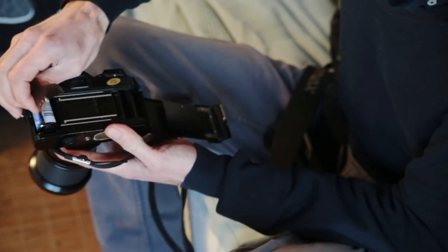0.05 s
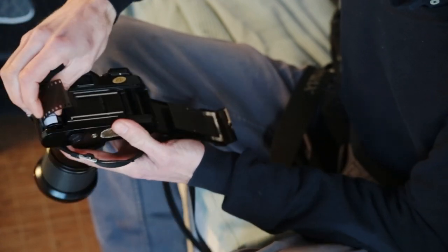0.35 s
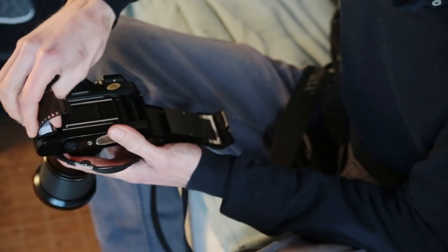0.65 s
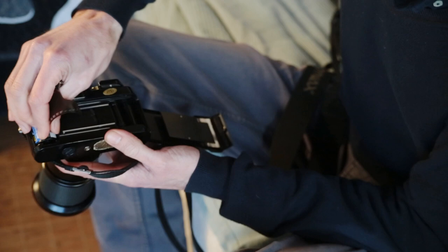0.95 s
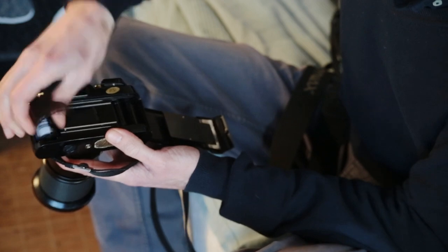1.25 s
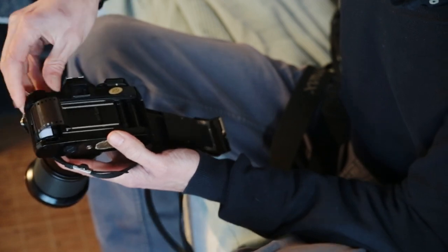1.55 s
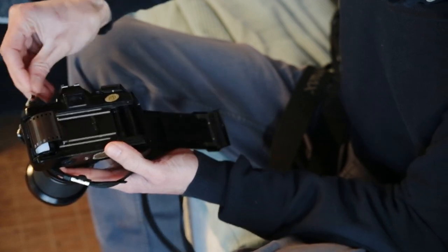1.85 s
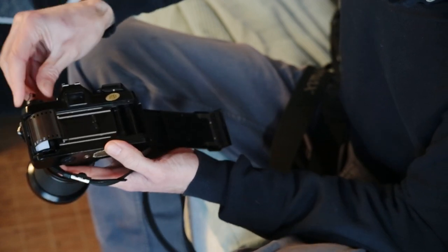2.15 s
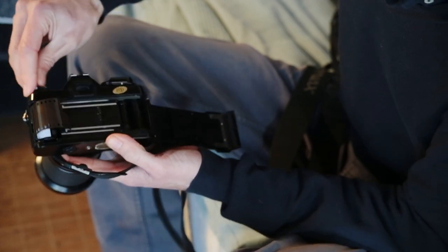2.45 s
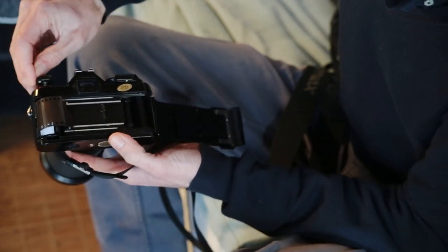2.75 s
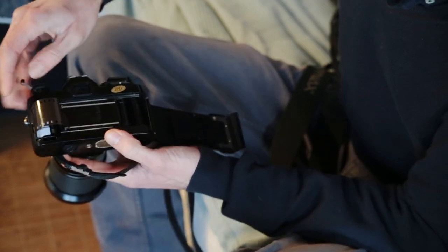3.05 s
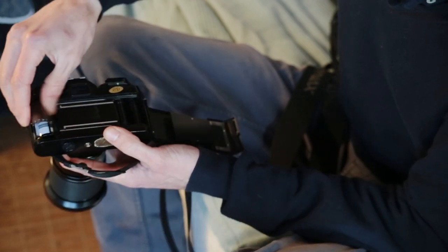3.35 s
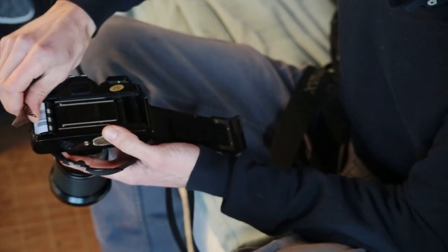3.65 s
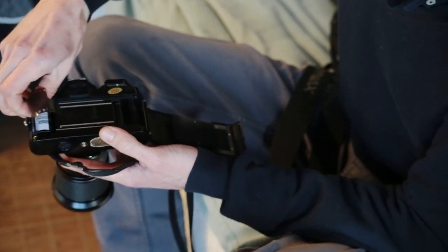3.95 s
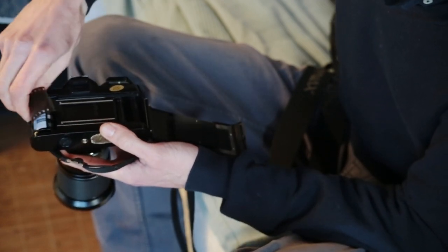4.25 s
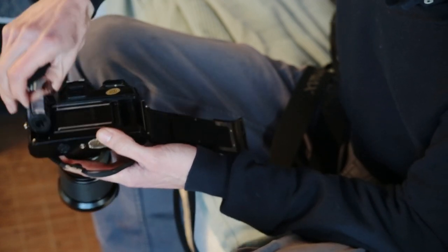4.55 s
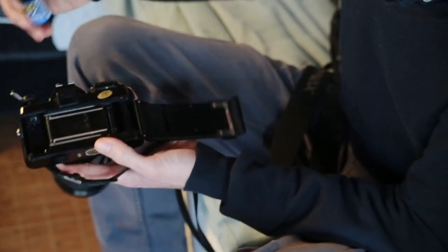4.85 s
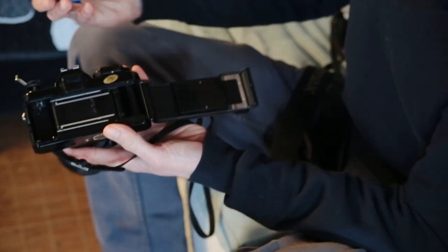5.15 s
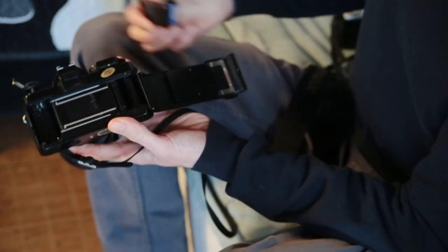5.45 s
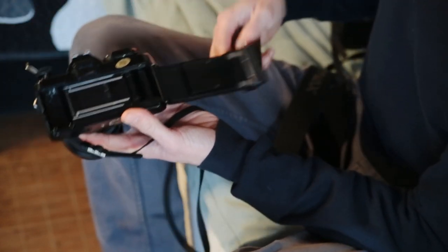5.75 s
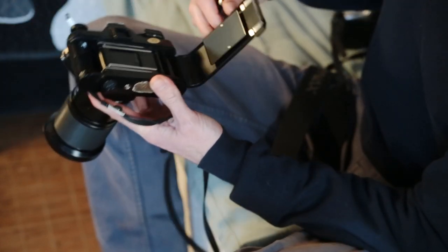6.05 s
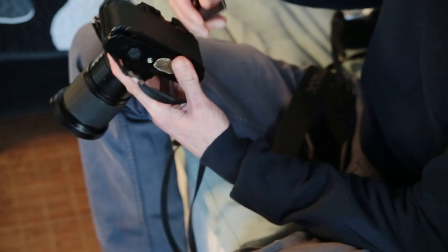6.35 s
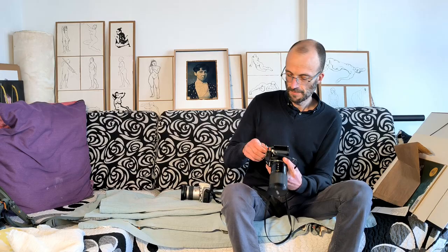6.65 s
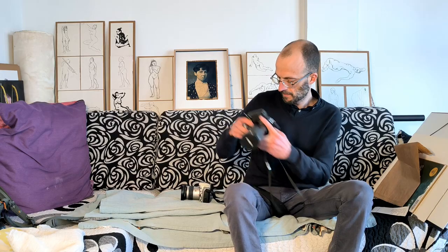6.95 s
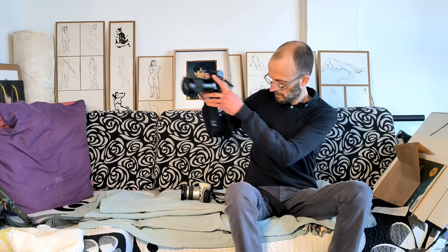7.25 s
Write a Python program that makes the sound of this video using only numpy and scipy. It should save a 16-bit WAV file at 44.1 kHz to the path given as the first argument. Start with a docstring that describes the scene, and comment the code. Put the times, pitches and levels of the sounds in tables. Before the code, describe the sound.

Close to the microphone in a living room, fingers work the rewind crank of an open film camera, making clusters of small, sharp clicks with pauses between. The metal crank buzzes briefly, and the cassette comes out with more clicks and tiny scrapes. A sleeve rustles softly, then the back is shut with a few ringing knocks. Faint ticks follow, over a low room rumble and hiss.

```python
"""Handling an open film camera

Close to the microphone in a living room, fingers work the rewind crank and ease the film cassette out.
Small parts click when tapped and scrape as they slide, and the metal crank buzzes briefly. A sleeve
rustles, and the back is swung shut and pressed until it latches, with knocks that make the body ring.
Each contact leaves a short room echo, over a faint steady rumble and hiss."""
import sys
import numpy as np
from scipy import signal
from scipy.fft import rfft, irfft
from scipy.io import wavfile

SR = 44100
rng = np.random.default_rng(int(sys.argv[2]) if len(sys.argv) > 2 else 0)


def waveform_to_disk(signal):
    """Save audio, clipped to [-1, 1], as 16-bit WAV at the path in sys.argv[1]."""
    frames = np.transpose(np.atleast_2d(signal))
    scaled = np.clip(frames, -1, 1) * 32767
    samples = np.round(scaled).astype(np.int16)
    wavfile.write(sys.argv[1], SR, samples)


N = 331191
TIME = np.arange(N) / SR

# Clicks as the cassette is worked, the crank pulled up, the cassette prised out, the back swung round
# and the camera turned over. Each row: start in seconds, relative level in dB, ringing pitch in Hz,
# added brightness in dB per octave.
CLICKS = [ (0.054, -45.5, 8000, 7.5), (0.097, -46.5, 2040, -2.5), (0.277, -29, 2210, -4.5),
          (0.3063, -30, 2520, -6), (0.3127, -32.5, 5130, -2), (0.341, -34, 2660, -5.5),
          (0.407, -40.5, 3040, -6), (0.854, -48, 4720, -6.5), (0.9373, -27, 5500, -3.5),
          (0.951, -34, 3330, -2), (0.991, -31.5, 2950, -2.5), (1.093, -37.5, 1830, -3),
          (1.21, -50, 2650, -8), (1.256, -40, 1830, -2.5), (1.295, -40, 2250, -3), (1.337, -29, 2350, -1.5),
          (1.350, -27, 2700, 0), (1.4087, -22, 10040, 22.5), (1.4216, -30, 4400, 6.5),
          (1.566, -47, 2430, -9.5), (1.830, -45.5, 2480, -9.5), (1.902, -46.5, 2820, -3.5),
          (2.012, -53.5, 1940, -8), (2.264, -52.5, 1740, -4), (2.664, -54.5, 1230, -24),
          (2.7375, -34.5, 3170, -5), (2.7497, -31, 2360, 4.5), (2.7723, -37, 3030, 2),
          (3.2948, -33, 7700, 6.5), (3.304, -34.5, 9450, 3.5), (3.4037, -35, 9300, 4.5),
          (3.4294, -39, 3900, -1.5), (3.608, -54.5, 1640, -2), (3.8355, -34, 9600, 11),
          (3.855, -31, 5950, 8.5), (3.9137, -38.5, 2320, -1), (3.963, -48, 2620, -3),
          (4.060, -47.5, 2480, -7.5), (4.095, -50.5, 2840, -11), (4.1313, -37.5, 2280, -5),
          (4.139, -38, 2570, -2.5), (4.495, -38.5, 2070, 1), (4.617, -48.5, 4570, -7.5),
          (4.759, -52, 7340, -.5), (5.379, -50, 3350, 2), (5.5607, -45.5, 4530, 5), (5.614, -56, 1050, -14),
          (5.670, -34, 4500, 14), (5.690, -38, 7850, 6), (5.836, -46.5, 3120, 4),
          (6.349, -45.5, 1640, -0.5), (6.962, -45.5, 3930, 3), (7.0672, -47.5, 2920, -13.5),
          (7.107, -48, 2980, -6.5), (7.261, -46, 3440, 1)]


def clicks(tails, chatter_fade_s=0.018, ring_db=-3.0, ring_sharpness=2.8, gain_db=20.5, low_cut_hz=900):
    """Each click is a sharp crack plus the very short ring of the small part that was touched."""
    # The tone of a click. Each row: frequency in Hz, relative level in dB.
    tone = [(150, -55), (400, -14.5), (800, -15), (1200, -12), (1700, -4), (2800, -3), (4200, -4.5),
            (6500, -5), (9000, -9.5), (16000, -25)]
    out = np.zeros(N)
    low_cut = signal.butter(2, low_cut_hz, "high", fs=SR, output="sos")  # small parts give little bass
    for k, (s, db, hz, tilt_db) in enumerate(CLICKS + grazes() + settling()):
        ring = unit_energy(resonate(response(tone), hz, hz / ring_sharpness))
        part = signal.sosfilt(low_cut, response(tone, tilt_db) + from_db(ring_db) * ring)
        click = contact(part, tails[k % len(tails)], chatter_fade_s, room_db=-2, tap_db=-8.5)
        add(out, s, from_db(db + gain_db) * click)
    return out


def grazes(lead_s=0.0065, softer_db=20.5):
    """A part touches its seat lightly just before it snaps home. Gives extra click rows."""
    return [(s - lead_s, db - softer_db, hz, tilt_db) for s, db, hz, tilt_db in CLICKS]


def settling(count=3, gap_s=0.027, softer_db=21, fade_db_per_s=79):
    """A touched part settles with a few faint ticks, each weaker than the last. Gives extra click rows."""
    delays = gap_s * np.cumsum(rng.uniform(.5, 2, (len(CLICKS), count)), axis=1)
    return [(s + delay, db - softer_db - fade_db_per_s * delay, hz, tilt_db)
            for (s, db, hz, tilt_db), row in zip(CLICKS, delays) for delay in row]


def knocks(tails, chatter_fade_s=0.022, body_db=-9.0, body_fade_s=0.11, gain_db=22.0):
    """A knock is fuller than a click. It bounces once and sets the camera body ringing."""
    # Knocks on the body, mostly the back closing. Each row: start in seconds, relative level in dB.
    blows = [(3.2959, -43.5), (3.8352, -34.5), (6.387, -23), (6.509, -29), (6.635, -31.5), (6.722, -32.5)]
    # The tone of a knock. Each row: frequency in Hz, relative level in dB.
    tone = [(110, -24), (200, -5.5), (290, -2), (400, -9), (540, -0.5), (850, -1), (1100, 2), (1500, 6.5),
            (2200, -4), (3700, -1.5), (7000, -2), (10000, -9), (16000, -19)]
    # The notes of springs and plates in the body. Each row: pitch in Hz, relative level in dB.
    body_notes = [(646, 7.5), (1193, -10), (1258, -25), (1477, -7), (1591, 12.5), (2157, 10.5), (2312, 7),
                  (2397, 1), (2746, -21), (3534, 15), (4315, 1), (6383, -42.5)]
    out, t = np.zeros(N), TIME[:SR // 2]
    # For each dB that a knock falls short of a full blow, its bounce loses about two.
    bounce_s, full_blow_db, bounce_loss = 0.0036, -24, 2.02
    bounces = [(s + bounce_s, full_blow_db + bounce_loss * (db - full_blow_db)) for s, db in blows]
    part = response(tone, tilt_db=2)
    for k, (s, db) in enumerate(blows + bounces):
        body = np.zeros(len(t))
        for hz, note_db in body_notes:
            strength = from_db(note_db + rng.normal(0, 1.4)) * rng.choice([-1, 1])
            body += strength * np.sin(2 * np.pi * hz * t)
        crack = contact(part, tails[k % len(tails)], chatter_fade_s, room_db=-1.5, tap_db=-30.0)
        add(out, s, from_db(db + gain_db) * crack)
        add(out, s, from_db(db + gain_db + body_db) * unit_energy(body * fade(t, body_fade_s)))
    return out


def contact(part, tail, chatter_fade_s, room_db, tap_db):
    """A tap and a moment of chatter shake a part. We hear it directly and as a room echo."""
    t = TIME[:SR // 25]
    force = unit_energy(rng.standard_normal(len(t)) * fade(t, chatter_fade_s))
    force[0] += from_db(tap_db)
    direct = unit_energy(signal.fftconvolve(force, part))
    heard = from_db(room_db) * signal.fftconvolve(direct, tail)
    heard[:len(direct)] += direct
    return heard


def crank(width_hz=180):
    """The loose metal rewind crank buzzes on for a moment after its click, at two pitches."""
    # The two buzzes. Each row: start in seconds, pitch in Hz, level in dB, fade time in seconds.
    buzzes = [(2.749, 2717, -56, 0.6), (2.747, 8300, -43, 0.18)]
    out, t = np.zeros(N), TIME[:SR // 2]
    for s, hz, db, fade_s in buzzes:
        buzz = unit_level(resonate(rng.standard_normal(len(t)), hz, width_hz))
        add(out, s, from_db(db) * buzz * fade(t, fade_s))
    return out


def scrapes(squeak_width_hz=480, overtone_ratio=1.476, overtone_db=-10.5):
    """Parts slide on each other in many tiny slips, making a rough noise with a squeak in it."""
    # The slides. Each row: start in seconds, length in seconds, level in dB, squeak pitch in Hz.
    slides = [(0.159, .07, -66.5, 2100), (2.934, .033, -65.5, 8820), (3.224, 0.029, -49, 4150),
              (3.392, 0.0069, -47, 4430), (4.553, 0.074, -64, 2090), (5.209, 0.054, -66.5, 8000),
              (5.516, .012, -58, 6860), (5.82, 0.013, -49.5, 4420), (5.975, 0.041, -56, 4860),
              (6.016, .014, -45, 4600), (6.377, 0.012, -33, 6070), (6.489, 0.018, -37.5, 5660),
              (6.603, 0.031, -46, 5540), (7.157, 0.017, -58.5, 7160), (7.158, 0.049, -55, 3134)]
    # The tone of the rough noise. Each row: frequency in Hz, relative level in dB.
    tone = [(200, -22), (1000, 0.5), (2000, -0.5), (4000, 5.5), (7500, 8), (11000, -3.5), (16000, 0.5)]
    out = np.zeros(N)
    for s, length_s, db, hz in slides:
        slips = friction(max(int(length_s * SR), 64), rough_db=5)
        squeak = resonate(slips, hz, squeak_width_hz)
        squeak += from_db(overtone_db) * resonate(slips, hz * overtone_ratio, squeak_width_hz)
        slide = unit_level(colour(slips, tone) + unit_level(squeak))
        soft_ends = signal.windows.tukey(len(slide), .25)
        add(out, s, from_db(db) * slide * soft_ends)
    return out


def rustle(clump_db=7.0, clump_s=0.0034, swell_db_per_s=21.5, ease_db_per_s=33, fingers_db=-80.5):
    """Sleeve fibres catch and let go in little clumps, swelling and easing as the arm moves."""
    # Arm movements. Each row: loudest moment in seconds, level then in dB.
    arm_moves = [(5.8, -60), (7.051, -66)]
    # The tone of the cloth. Each row: frequency in Hz, relative level in dB.
    tone = [(150, -8), (600, 3), (1500, 1.5), (4000, 3), (7000, 1), (11000, -9.5), (16000, -15)]
    moves_db = [db - np.maximum(swell_db_per_s * (s - TIME), ease_db_per_s * (TIME - s))
                for s, db in arm_moves]
    level_db = np.maximum(np.max(moves_db, axis=0), fingers_db)  # the fingers never stop brushing
    catching = np.interp(TIME / clump_s, np.arange(N), np.minimum(rng.standard_normal(N), 2))
    slips = friction(N, rough_db=8.0) * from_db(clump_db * catching)
    return from_db(level_db) * colour(slips, tone)


def friction(count, rough_db):
    """Rubbing surfaces move in tiny slips of very uneven size."""
    return rng.standard_normal(count) * from_db(rough_db * np.clip(rng.standard_normal(count), -3, 3))


def room_tail(first_echo_s=0.00088, build_s=0.0074):
    """Echoes in the room build up quickly and blur into a tail. The middle pitches last longest."""
    # How long the room rings. Each row: frequency in Hz, fade time in seconds.
    fade_times = [(150, 0.25), (600, 0.46), (1500, 0.38), (3000, 0.35), (7000, 0.27), (15000, 0.31)]
    t = TIME[:SR * 2 // 5]
    hz = np.fft.rfftfreq(len(t), 1 / SR)
    noise_spectrum = rfft(rng.standard_normal(len(t)))
    edges_hz = np.r_[0, np.geomspace(350, SR / 2, 7)]
    tail = np.zeros(len(t))
    for low, high in zip(edges_hz, edges_hz[1:]):
        band = irfft(noise_spectrum * (hz >= low) * (hz < high), len(t))
        tail += band * fade(t, at_hz(fade_times, (low + high) / 2))
    return unit_energy(tail * np.clip((t - first_echo_s) / build_s, 0, 1))


def rumble_and_hiss(rumble_db=-68.0, hiss_db=-69.5, side_db=-12.5):
    """The room rumbles almost alike on the left and right. Each side adds its own electronic hiss."""
    # The tone of the rumble. Each row: frequency in Hz, relative level in dB.
    tone = [(25, -8.5), (45, -6.5), (110, -7.5), (170, -3.5), (300, -11), (550, -14.5), (750, -13.5),
            (1500, -18.5), (4000, -24), (16000, -23.5)]
    middle, side = (colour(rng.standard_normal(N), tone) for _ in range(2))
    rumble = middle + from_db(side_db) * side * np.array([[1], [-1]])
    return from_db(rumble_db) * rumble + from_db(hiss_db) * rng.standard_normal((2, N))


def response(tone, tilt_db=0, size=1024):
    """The sound of one perfect tap with this tone, brightened by tilt_db per octave above 1500 Hz."""
    hz = np.abs(np.fft.fftfreq(size, 1 / SR))
    octaves = np.log2(np.maximum(hz, 1500) / 1500)
    log_gain = np.log(from_db(at_hz(tone, hz) + tilt_db * octaves))
    spectrum = np.exp(np.conj(signal.hilbert(log_gain)))  # packs the sound at the start of the tap
    return unit_energy(np.fft.ifft(spectrum).real)


def colour(x, tone):
    """Give a noise this tone, at an average level of 1."""
    return unit_level(signal.fftconvolve(x, response(tone, size=8192))[:len(x)])


def resonate(x, hz, width_hz):
    """Make a sound ring at one pitch. A narrower width rings longer."""
    r = np.exp(-np.pi * width_hz / SR)
    return signal.lfilter([1, 0, -1], [1, -2 * r * np.cos(2 * np.pi * hz / SR), r * r], x)


def fade(t, fade_s):
    """Die away smoothly. The fade time is how long it takes to drop by 60 dB."""
    return 1000 ** (-t / fade_s)


def at_hz(rows, hz):
    """Read between the rows of a table, giving each octave equal space."""
    table = np.array(rows)
    return np.interp(np.log(hz + 1), np.log(table[:, 0]), table[:, 1])


def from_db(db):
    """Turn decibels into a number to multiply by."""
    return 10 ** (np.asarray(db) / 20)


def unit_level(x):
    """Scale a sound so its average level (rms) is 1."""
    return x / np.sqrt(np.mean(x ** 2) + 1e-20)


def unit_energy(x):
    """Scale a sound so its squared samples add up to 1."""
    return x / np.sqrt(np.sum(x ** 2) + 1e-20)


def add(track, s, sound):
    """Mix a sound into the track, starting at s seconds."""
    start = max(round(s * SR), 0)
    track[start:start + len(sound)] += sound[:max(N - start, 0)]


def scene(rubbing_room_db=-2.5):
    """Mix it all. The camera keeps moving, so the contacts take turns among several room tails."""
    tails = [room_tail() for _ in range(12)]
    rubbing = scrapes() + rustle()
    rubbing_echo = from_db(rubbing_room_db) * signal.fftconvolve(rubbing, tails[0])[:N]
    return clicks(tails) + knocks(tails) + crank() + rubbing + rubbing_echo + rumble_and_hiss()


def record(dry, cutoff_hz=16100):
    """Cut away the very highest treble."""
    return signal.sosfilt(signal.ellip(10, .1, 80, cutoff_hz, fs=SR, output="sos"), dry)


dry = scene()
out = record(dry)
waveform_to_disk(out)
```